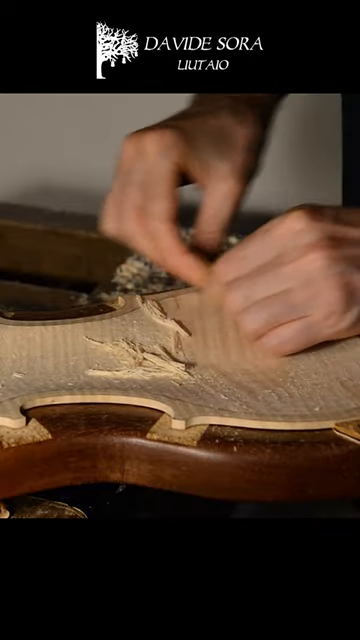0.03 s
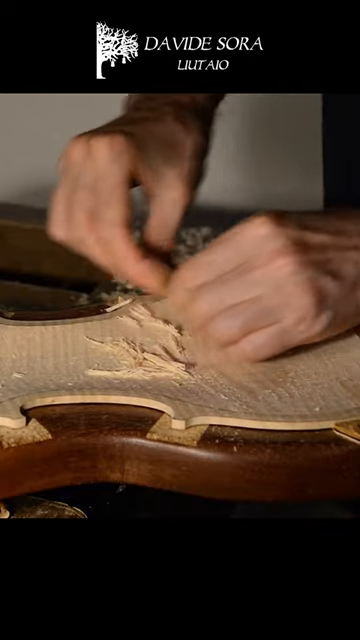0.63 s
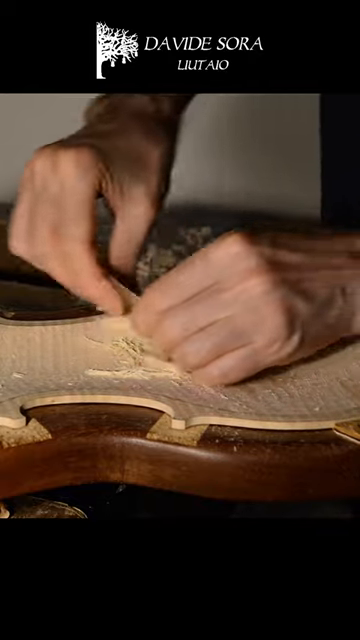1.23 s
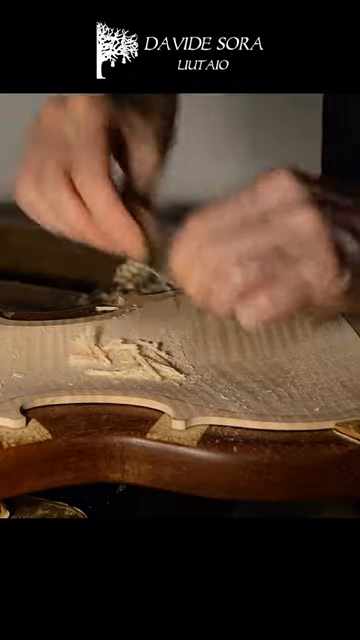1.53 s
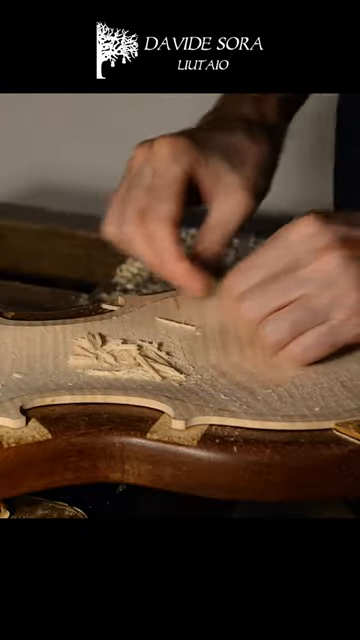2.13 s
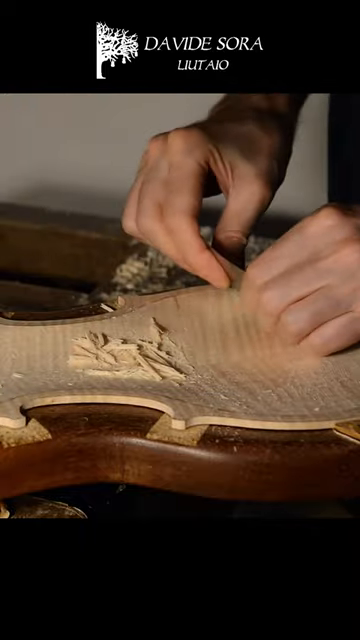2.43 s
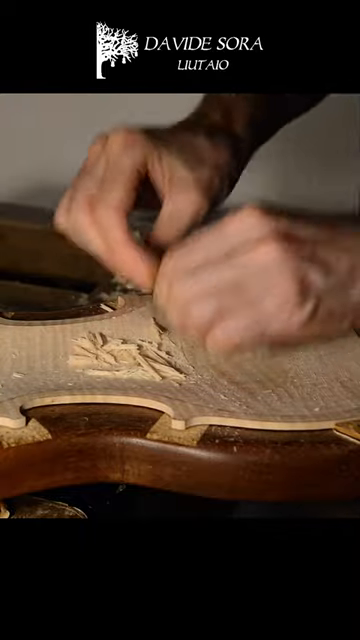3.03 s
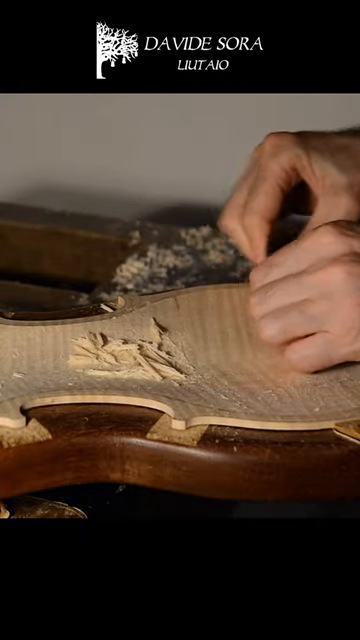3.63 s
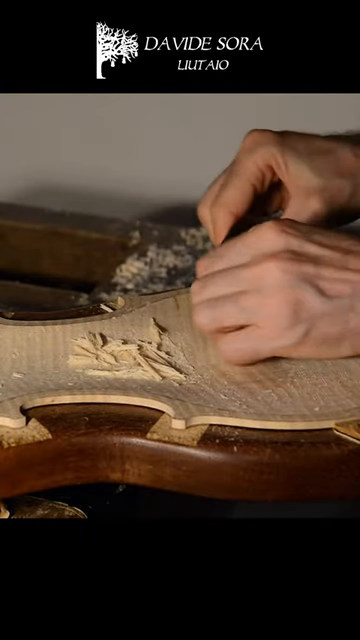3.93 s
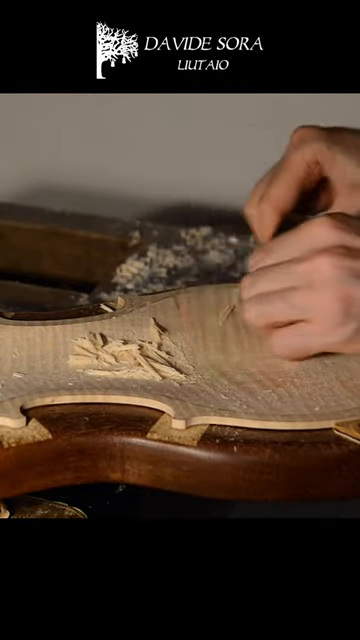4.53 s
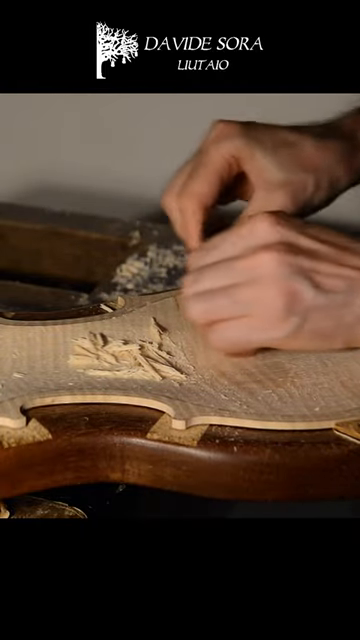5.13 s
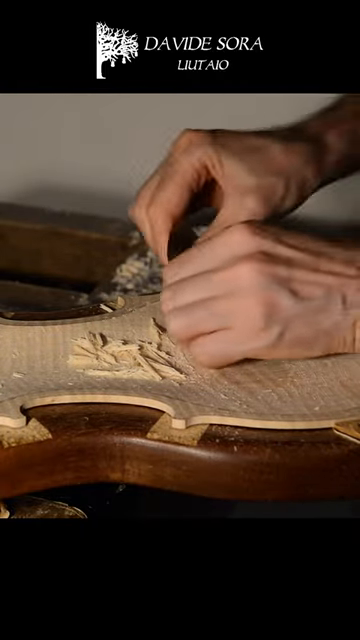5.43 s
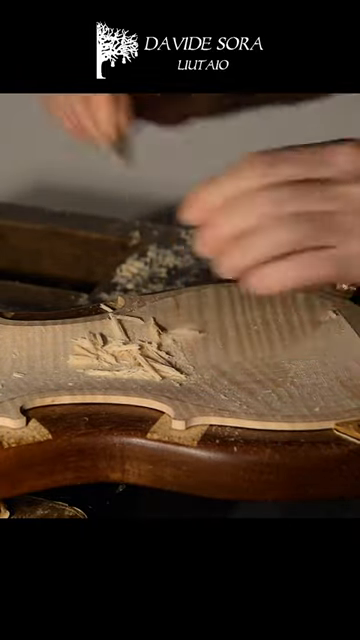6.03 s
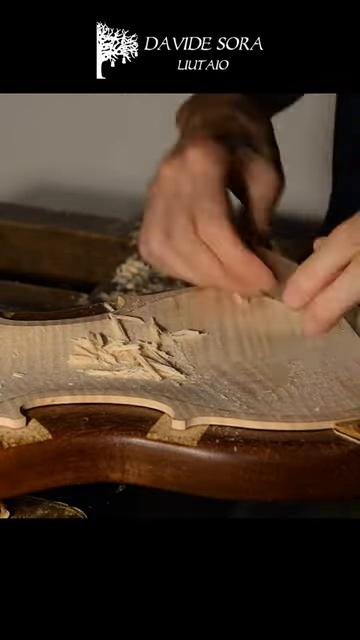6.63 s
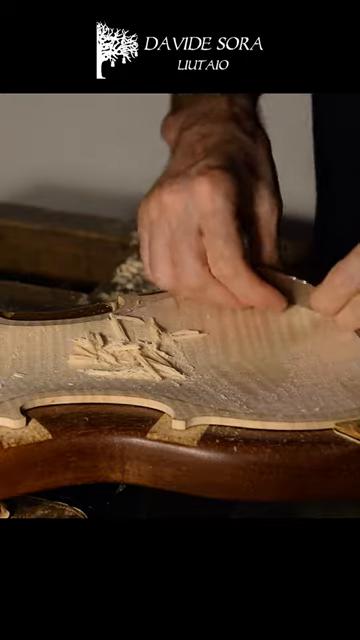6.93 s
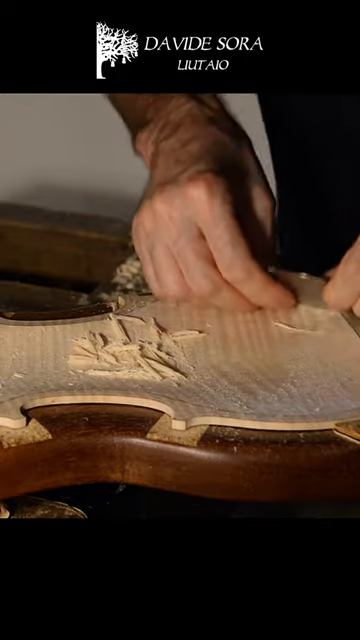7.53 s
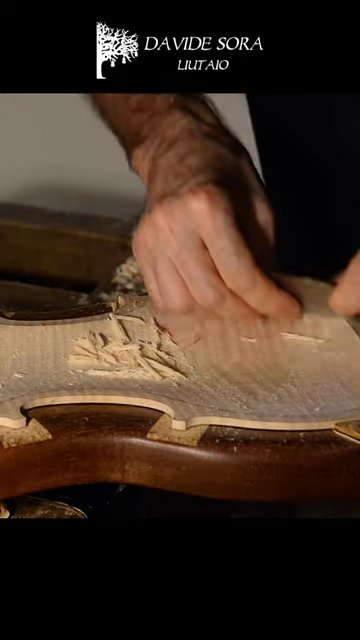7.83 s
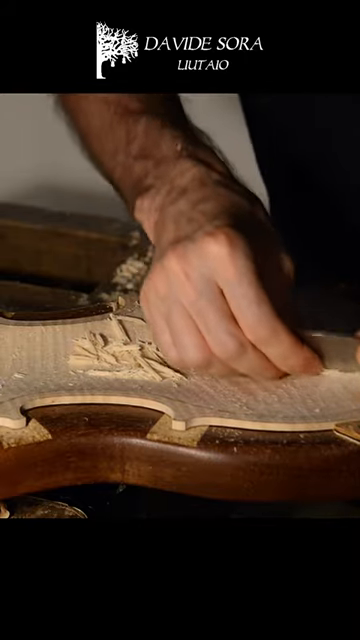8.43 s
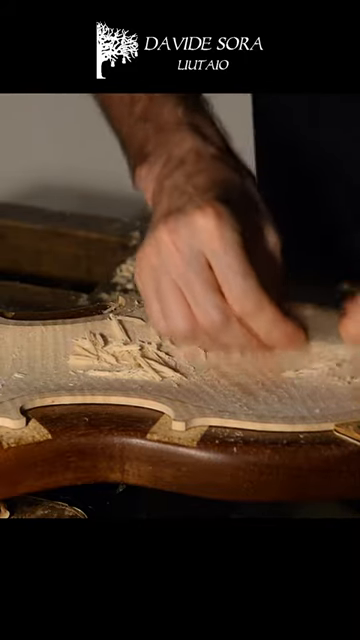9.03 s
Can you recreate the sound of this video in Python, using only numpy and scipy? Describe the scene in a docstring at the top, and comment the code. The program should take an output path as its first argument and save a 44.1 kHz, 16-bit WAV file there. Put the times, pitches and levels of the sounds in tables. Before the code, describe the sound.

Close, gritty scraping of a hand blade on a thin maple plate, in a brisk back-and-forth rhythm with an occasional knock as the steel lands. After about six seconds the work stops for a soft swish of a hand clearing shavings. A sharp tap follows and the scraping resumes more gently. The small workshop adds a short echo and a faint low rumble.

```python
"""A thin steel hand scraper thins a maple plate on a bench in a small workshop. From the start, cuts
tear streams of fibres that set the plate ringing; between them the blade drags back, fingers rub and
the bench booms softly. The blade lands with a sharp tap at 1.7 s and works on. In a pause near 6.3 s
a hand brushes shavings aside with a soft thud, then the blade is set down sharply again. From 7.1 s
six lighter cuts follow. Still air, a faint drone and a rumble lie under it all."""
import sys
import numpy as np
from scipy import signal
from scipy.fft import rfft, irfft, next_fast_len
from scipy.io import wavfile

SR = 44100
rng = np.random.default_rng(int(sys.argv[2]) if len(sys.argv) > 2 else 0)


def unload_wav(signal):
    """Save mono or channel-first audio to the path in sys.argv[1] as 16-bit WAV at rate SR, clipped to [-1, 1]."""
    wavfile.write(
        sys.argv[1],
        SR,
        np.round(np.clip(np.atleast_2d(signal).T, -1, 1) * 32767).astype(np.int16),
    )


N = 409688
TIME = np.arange(N) / SR
BANDS_HZ = np.geomspace(125, 16000, 15)

# cutting strokes: (start [s], length [s], peak position [0-1], level [dB])
CUTS = [(0.028, 0.18, 0.36, -10.5), (0.391, 0.18, 0.4, -14.5), (0.755, 0.16, 0.4, -11),
        (1.099, .19, 0.31, -12), (1.736, 0.2, 0.43, -13), (2.116, 0.17, .38, -9), (2.466, 0.17, 0.44, -8.5),
        (2.835, 0.2, 0.41, -10.5), (3.434, 0.12, 0.64, -20), (3.778, .19, 0.42, -14.5),
        (4.157, .19, 0.57, -13), (4.546, 0.16, 0.69, -10), (4.924, 0.18, 0.49, -9.5),
        (5.298, 0.17, 0.5, -9.5), (5.69, 0.25, 0.38, -10), (7.141, 0.18, 0.69, -23.5),
        (7.535, 0.22, 0.46, -20.5), (7.921, 0.21, 0.31, -17.5), (8.27, 0.21, 0.37, -17),
        (8.648, 0.21, 0.38, -16.5), (9.013, .19, 0.48, -16)]
# the blade drags back or feels for its place: (start [s], length [s], peak position [0-1], level [dB],
#   ring pitch [Hz], ring boost or cut [dB], bench boom [dB])
DRAGS = [(-.06, 0.12, 0, -23, 5440, -6, -66), (0.228, 0.085, 0.75, -21.5, 6100, 4, -56),
         (0.312, 0.054, 0.1, -14, 2540, 3, -77), (0.599, 0.13, 0.82, -15, 3800, 5, -48),
         (0.951, 0.13, 0.68, -16.5, 3400, 7.5, -59), (1.66, 0.083, 0.1, -24, 1077, 19.5, -77),
         (1.949, 0.096, 0.5, -22, 4540, 4.5, -55.5), (2.024, 0.07, 0.85, -18, 2680, 5, -54),
         (2.31, 0.16, 0.67, -17, 1800, -1, -62), (2.668, 0.11, 0.1, -19.5, 2540, -5, -62),
         (2.722, 0.076, 0.85, -14, 2650, 4, -73), (3.264, 0.1, 0, -39, 1450, 14.5, -60),
         (3.636, 0.1, 0.27, -22.5, 1350, 4, -64), (3.992, 0.13, 0.77, -19, 1610, 7, -54),
         (4.37, 0.15, 0.6, -15, 3200, 0, -59), (4.743, 0.14, 0.74, -15.5, 3000, 7, -65),
         (5.121, 0.16, 0.8, -17.5, 1410, 3, -58), (5.519, .14, 0.7, -13, 1480, 6, -48),
         (6.926, 0.12, 0.66, -35.5, 4420, 5, -80), (7.116, 0.06, 0.4, -36.5, 5540, 7, -83),
         (7.393, 0.12, 0.81, -21.5, 2110, 2.5, -66), (7.759, 0.15, .58, -18, 1740, 6.5, -65),
         (8.126, .16, 0.37, -18, 2750, 5.5, -63), (8.489, 0.19, 0.33, -21, 1470, 3, -72),
         (8.844, 0.21, 0.36, -18, 2180, 5.5, -64), (9.213, 0.12, 1, -14, 2320, 12, -80)]
# deep tone of the drone and the palm thud: (frequency [Hz], level [dB])
DEEP_COLOUR = [(45, -28), (60, -18), (70, 16), (82, -22), (100, -10)]


def from_db(db):
    """Decibels to gain."""
    return 10 ** (np.asarray(db) / 20)


def rms_one(x):
    """Scale to unit power."""
    return x / np.sqrt(np.mean(x ** 2) + 1e-20)


def at_hz(points, hz):
    """Read a table on a log-frequency axis."""
    known_hz, values = np.transpose(points)
    return np.interp(np.log(np.maximum(hz, 1)), np.log(known_hz), values)


def in_bout(table, time_s):
    """The settings that hold at a given moment."""
    return max((row for row in table if row[0] <= time_s), default=table[0])[1:]


def bump(middle_s, half_s, level_db):
    """A bell-shaped swell."""
    return from_db(level_db) * np.exp(-np.minimum(((TIME - middle_s) / half_s) ** 2, 50))


def drift(rate):
    """Random wander of spread 1 through `rate` points a second."""
    return rms_one(np.interp(TIME * rate, np.arange(N), rng.standard_normal(N)))


def split(x):
    """Overlapping half-octave bands that add up to the whole."""
    size = next_fast_len(len(x), True)
    spectrum, hz = rfft(x, size), np.fft.rfftfreq(size, 1 / SR)
    weights = [at_hz(np.c_[BANDS_HZ, pick], hz) for pick in np.eye(len(BANDS_HZ))]
    return np.array([irfft(spectrum * weight, size)[:len(x)] for weight in weights])


def noise(colour):
    """Unit-power noise of a given colour, rolling off beyond its ends."""
    size = next_fast_len(N, True)
    hz = np.fft.rfftfreq(size, 1 / SR) + 1
    skirts = np.minimum(1, np.minimum(hz / colour[0][0], colour[-1][0] / hz)) ** 4
    spectrum = rfft(rng.standard_normal(size)) * from_db(at_hz(colour, hz)) * skirts
    return rms_one(irfft(spectrum, size)[:N])


def bell_eq(x, hz, q, gain_db):
    """Boost or cut a band whose centre may glide."""
    turn = np.exp(2j * np.pi * np.cumsum(np.broadcast_to(hz, len(x))) / SR)
    pole = np.exp(-np.pi * np.mean(hz) / (q * SR))
    band = 2 * (turn * signal.lfilter([1 - pole], [1, -pole], x / turn)).real
    return x + (from_db(gain_db) - 1) * band


def room_tone():
    """The still air of the workshop, over a faint drone and rumble that swell and sink."""
    # spectra of the air and the rumble: (frequency [Hz], level [dB])
    air_colour = [(50, -24), (120, -9), (450, -11.5), (800, -13.5), (1400, -11.5), (2400, -15),
                  (5000, -19.5), (9000, -31.5), (15000, -32.5)]
    rumble_colour = [(18, -7), (32, -6), (48, 9), (65, -25.5)]
    # fader rides of the drone and the rumble: (time [s], level [dB])
    drone_ride = [(0.0, -82), (1.55, -70), (2.14, -60), (5.44, -69.5), (5.51, -58), (5.92, -71), (6.2, -77)]
    rumble_ride = [(0.0, -58), (0.54, -63), (0.65, -70), (8.07, -77), (8.41, -90), (8.54, -62), (9.29, -61)]
    drone = from_db(np.interp(TIME, *np.transpose(drone_ride)) + 0.5) * noise(DEEP_COLOUR)
    rumble = from_db(np.interp(TIME, *np.transpose(rumble_ride)) - 1) * noise(rumble_colour)
    return from_db(-62) * noise(air_colour) + drone + rumble


def workshop(x, first_echo_s=0.00048, wet=0.29):
    """Dense reflections follow the direct sound; the treble dies first."""
    # reverb decay: (frequency [Hz], time to fall 60 dB [s])
    room_t60 = [(150, 1), (700, 0.69), (1600, 0.37), (5000, 0.41), (9000, 0.31), (15000, 0.23)]
    age = TIME[:SR * 2 // 3]
    fade = from_db(-60 * age / at_hz(room_t60, BANDS_HZ)[:, None])
    fade *= np.clip(age / first_echo_s - 1, 0, 1)
    fade /= np.sqrt((fade ** 2).sum(axis=1, keepdims=True))
    tail = (split(rng.standard_normal(len(age))) * fade).sum(axis=0)
    return np.sqrt(1 - wet) * x + np.sqrt(wet) * signal.fftconvolve(x, tail)[:N]


def bench_boom(delay_s=0.092, half_s=0.1):
    """The bench booms just after each drag begins, and faintly as each cut ends."""
    # spectrum of the bench: (frequency [Hz], level [dB])
    boom_colour = [(95, -13), (117, -20), (127, 9.5), (138, -2.5), (185, -23)]
    rocking = sum(bump(start + delay_s, half_s, boom_db) for start, *_, boom_db in DRAGS)
    pressing = sum(bump(start + length, half_s, cut_db - 47) for start, length, _, cut_db in CUTS)
    return from_db(-2.5) * (rocking + pressing) * noise(boom_colour)


def palm_thud():
    """The brushing hand lands softly on the plate."""
    return bump(middle_s=6.375, half_s=0.042, level_db=-63) * noise(DEEP_COLOUR)


def finger_rub(delay_s=0.032, half_s=0.04):
    """Skin sliding on wood gives a soft, low swell early in every drag."""
    # spectrum of the rub: (frequency [Hz], level [dB])
    rub_colour = [(90, -34), (150, 0.5), (230, 9.5), (310, 8.5), (500, -1.5), (900, -48)]
    # weight of the rub in each bout: (from [s], level [dB])
    rub_levels = [(0, -60), (1.6, -68), (3.2, -52), (3.9, -49), (6.1, -66), (7.3, -53), (8, -76)]
    swells = sum(bump(start + delay_s, half_s, *in_bout(rub_levels, start)) for start, *_ in DRAGS)
    return swells * noise(rub_colour)


def plate(force, wander_db=3.0):
    """The plate rings at its resonances, each driven more or less as the point of contact moves."""
    # resonances of the maple: (frequency [Hz], width [Hz], boost [dB])
    plate_modes = [(243, 6.6, 9.5), (334.6, 11, 8), (478, 31, 9.5), (733.5, 61, 11), (1015, 31.6, 8.5),
                   (1199, 140, 5), (1390, 42, 7.5), (1528, 47, 7), (1700, 51, 4.5), (1969, 52, 5.5),
                   (2244, 150, 0.5), (2020, 44, 5), (2555, 36, 3.5), (3310, 270, 1), (4360, 130, 2.5),
                   (5140, 140, 2.5), (5870, 940, 1.5)]
    for hz, width_hz, boost_db in plate_modes:
        b, a = signal.iirpeak(hz, hz / width_hz, fs=SR)
        drive = force * from_db(wander_db * drift(18))
        force = force + (from_db(boost_db) - 1) * signal.lfilter(b, a, drive)
    return from_db(-2.5) * force


def rim_echoes(x, strength=0.11, count=6):
    """Waves come back from the rim of the plate, after 0.8-7 ms drawn anew for each stroke."""
    lags = (rng.uniform(.0008, .007, count) * SR).astype(int)
    signs = rng.choice([-1, 1], count)
    return x + strength * sum(sign * np.pad(x, (lag, 0))[:len(x)] for lag, sign in zip(lags, signs))


def blade_taps(attack_s=.0003):
    """The landing blade gives a short knock whose lower tones ring longest."""
    # landings and bounces: (time [s], level [dB])
    landings = [(1.6645, -16.5), (1.669, -22), (3.265, -34.5), (3.445, -31), (3.795, -20.5), (5.698, -21),
                (6.6694, -14), (6.674, -25.5), (6.742, -28.5), (6.947, -35), (7.127, -47), (7.409, -29)]
    # spectrum of a knock: (frequency [Hz], level [dB])
    tap_colour = [(150, -35), (450, -26), (750, -7), (1050, -3.5), (1600, 7), (2600, 0.5), (5500, 1),
                  (8000, -15), (15000, -51)]
    out, age = np.zeros(N), TIME[:SR // 10]
    t60 = 0.053 * (BANDS_HZ[:, None] / 1000) ** -0.21
    fade = from_db(at_hz(tap_colour, BANDS_HZ)[:, None] - 60 * age / t60)
    fade *= np.tanh(age / attack_s)   # each knock swells in over a fraction of a millisecond
    for time_s, level_db in landings:
        at = round(time_s * SR)
        knock = (split(rng.standard_normal(len(age))) * fade).sum(axis=0)
        out[at:at + len(age)] += from_db(level_db) * knock
    return out


def fibres(per_s, size_db, hiss_db, chatter_db, chatter_rate):
    """Fibres snap at random over a smooth friction hiss; the contact catches and slips on the grain."""
    sizes = from_db(size_db * np.minimum(rng.exponential(1, N), 4)) * rng.choice([-1, 1], N)
    snaps = rms_one(sizes * (rng.random(N) < per_s / SR))
    chatter = from_db(chatter_db * drift(chatter_rate))
    return rms_one((snaps + from_db(hiss_db) * rng.standard_normal(N)) * chatter)


def strokes(table, grips, colour, friction, peakedness, bite, grain_db, sweep=None, hold_after_s=np.inf):
    """Friction swells and fades with each stroke; grip and place on the plate set the tone of a bout."""
    bands, out = split(friction), np.zeros(N)
    bands *= from_db(grain_db * np.array([drift(35) for _ in BANDS_HZ]))   # the grain keeps changing
    octaves = np.log2(BANDS_HZ / 3000)
    below, above = np.clip(octaves, -2, 0), np.clip(octaves, 0, 2)[:, None]
    firm_db, attack_s = -15, .014
    for start, length, peak, level_db, *ring in table:
        *tone_db, deepening = in_bout(grips, start)
        # a lighter stroke keeps more of its boom, body and hiss
        lightness_db = (firm_db - level_db) * np.array([0.32, 0.26, 0.33, 0.33])
        boom_db, body_db, edge_db, dust_db = np.array(tone_db) + lightness_db
        contact = [(750, boom_db), (1500, body_db), (3000, 0), (6000, edge_db), (12000, dust_db)]
        band_db = level_db + at_hz(colour, BANDS_HZ) + at_hz(contact, BANDS_HZ)
        span = slice(*np.searchsorted(TIME, [start, start + length]))
        age = TIME[span] - start
        travel = age / length
        arc = np.interp(travel, [0, np.clip(peak, .02, .98), 1], [0, .5, 1])
        speed = np.abs(np.sin(np.pi * arc))
        speed = np.minimum(1, speed * max(1, length / hold_after_s))   # a long stroke holds full speed
        # positive deepening brings up the lows along the stroke
        gains = from_db(band_db[:, None] - deepening * np.outer(below, travel - .5))
        swell = speed ** (peakedness + bite * above)   # the treble needs speed
        swell *= np.tanh(age / attack_s)
        rasp = (swell * gains * bands[:, span]).sum(axis=0)
        level = np.sqrt(np.mean(rasp ** 2))
        if ring:
            ring_hz, ring_db, _ = ring
            rasp = bell_eq(rasp, ring_hz, q=9.0, gain_db=ring_db)
        if sweep:
            from_hz, to_hz, sweep_db = sweep
            rasp = bell_eq(rasp, np.geomspace(from_hz, to_hz, len(rasp)), q=4.9, gain_db=sweep_db)
        out[span] += level * rms_one(rim_echoes(rasp))
    return signal.sosfilt(signal.butter(2, 140, "high", fs=SR, output="sos"), out)


def hand_brush():
    """A hand sweeps shavings off the plate in one soft swish."""
    # the swish: (start [s], length [s], peak position [0-1], level [dB])
    swishes = [(6.235, 0.32, 0.59, -33)]
    # its tone: (from [s], boom [dB], body [dB], edge hiss [dB], dust hiss [dB], deepening [dB/octave])
    brush_grips = [(0, -12, -15, 1, 1, 3.9)]
    # its spectrum: (frequency [Hz], level [dB])
    brush_colour = [(200, -10), (450, -13), (750, -11), (1050, -0.5), (1500, 5.5), (2100, 7), (3000, 6),
                    (4300, -1), (6000, 0.5), (8000, -13.5), (10500, -23), (15000, -34)]
    sweeping = fibres(per_s=4000, size_db=1.0, hiss_db=12, chatter_db=-3.9, chatter_rate=34)
    return strokes(swishes, brush_grips, brush_colour, sweeping, peakedness=2.2, bite=0.05, grain_db=1.0)


def blade_drags():
    """The lightly held blade rasps back over the wood, mostly favouring one pitch in each drag."""
    # bouts: (from [s], boom [dB], body [dB], edge hiss [dB], dust hiss [dB], deepening [dB/octave])
    drag_grips = [(0, -3.5, -5.5, 5, 1.5, 1), (1.6, 1.5, -3, 4, 2.5, -5.5), (3.2, -3, -7, -0.5, 0, 0.5),
                  (6.8, -1.5, -0.5, 1.5, 3.5, -6.5)]
    # spectrum of a drag: (frequency [Hz], level [dB])
    drag_colour = [(200, -21.5), (450, -20.5), (750, -18.5), (1050, -12), (1500, 0.5), (2100, -1),
                   (3000, 0.5), (4300, -3.5), (6000, -4.5), (8000, -20.5), (10500, -24.5), (15000, -54)]
    dragging = fibres(per_s=3000, size_db=0.5, hiss_db=-3.5, chatter_db=1.5, chatter_rate=110)
    return strokes(DRAGS, drag_grips, drag_colour, dragging, peakedness=0.73, bite=0.21, grain_db=3.5)


def blade_cuts():
    """The edge tears a dense stream of fibres; the rasp deepens as the blade travels."""
    # bouts: (from [s], boom [dB], body [dB], edge hiss [dB], dust hiss [dB], deepening [dB/octave])
    cut_grips = [(0, -10, -3, 5, 4.5, 8.5), (1.6, -7.5, -1.5, 4.5, 6.5, 10.5), (3.2, -3.5, 2, 1.5, 5, 5),
                 (4.1, -12, -0.5, 1, 2, 5), (5.65, -9, 0.5, 1, 1.5, 2.5), (6.8, -9, -0.5, 5, 8, 12)]
    # spectrum of a cut: (frequency [Hz], level [dB])
    cut_colour = [(200, -17.5), (450, -17.5), (750, -10.5), (1050, -10.5), (1500, -2.45), (2100, -0.4),
                  (3000, 0), (4300, -3.5), (6000, -3.5), (8000, -18), (10500, -27.5), (15000, -42)]
    sinking_resonance = (6200, 1400, 2.91)   # (from [Hz], to [Hz], boost [dB])
    tearing = fibres(per_s=4000, size_db=2.0, hiss_db=-0.5, chatter_db=0.92, chatter_rate=170)
    return strokes(CUTS, cut_grips, cut_colour, tearing, peakedness=.8, bite=0.7, grain_db=2.5,
                   sweep=sinking_resonance, hold_after_s=.185)


def scene():
    """Blade and hand drive the plate, which sounds into the room."""
    wood = plate(blade_cuts() + blade_drags() + hand_brush() + blade_taps())
    in_room = workshop(wood + finger_rub())
    return (in_room + bench_boom() + palm_thud() + room_tone())[None]


def record(dry):
    """A steep low-pass takes off the top above 15.75 kHz."""
    return signal.sosfilt(signal.ellip(12, .1, 80, 15750, fs=SR, output="sos"), dry)


dry = scene()
out = record(dry)
unload_wav(out)
```